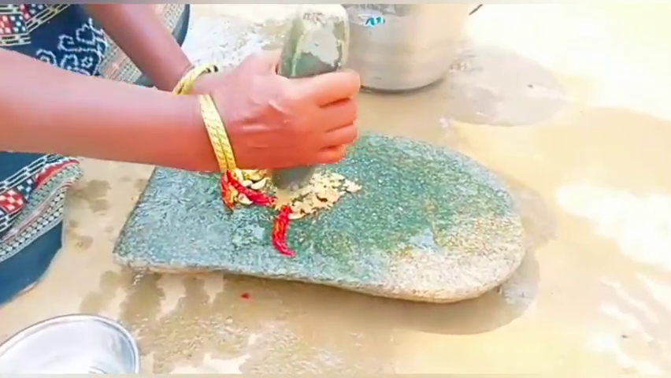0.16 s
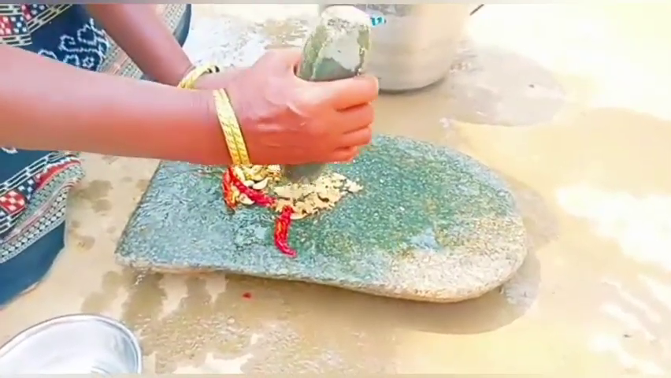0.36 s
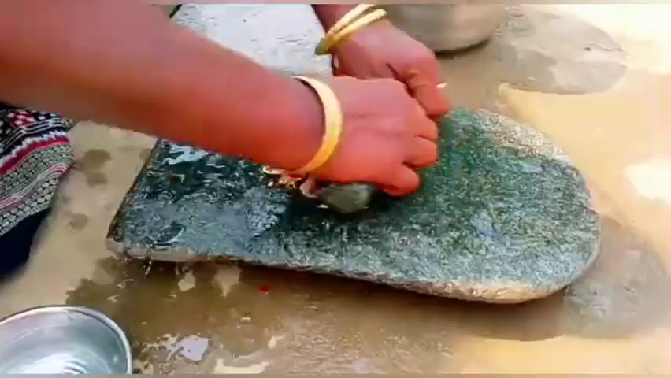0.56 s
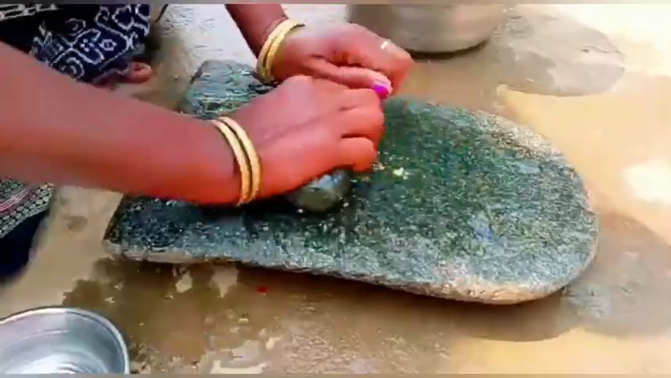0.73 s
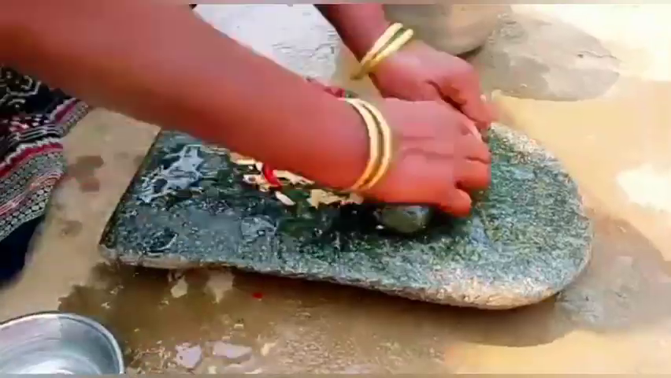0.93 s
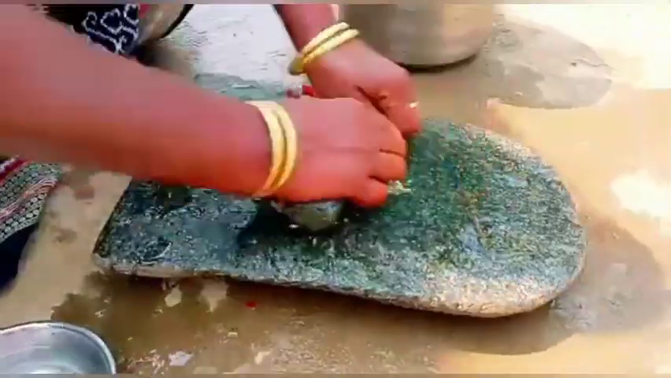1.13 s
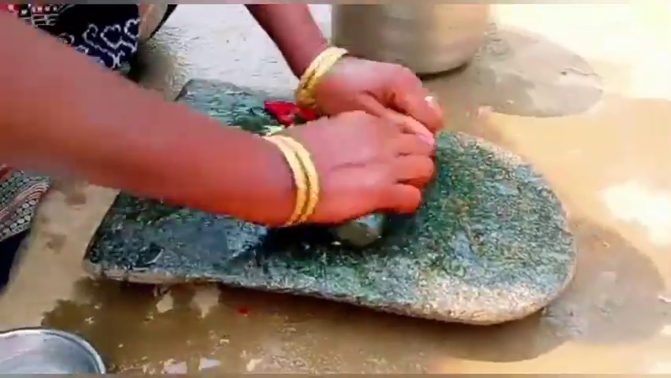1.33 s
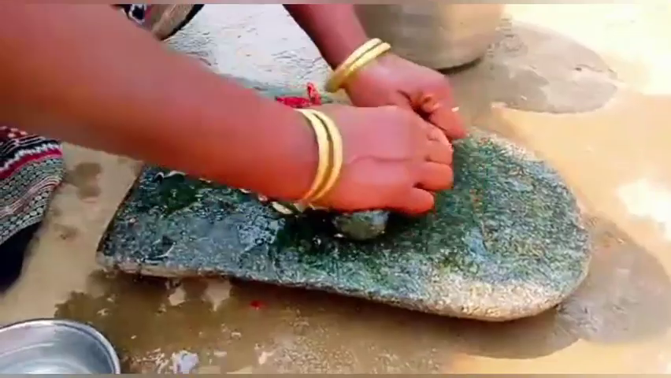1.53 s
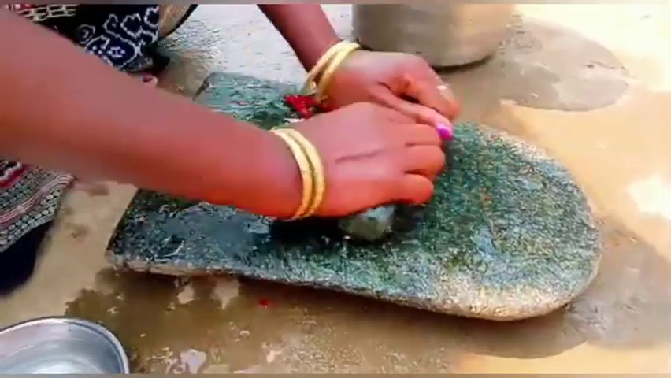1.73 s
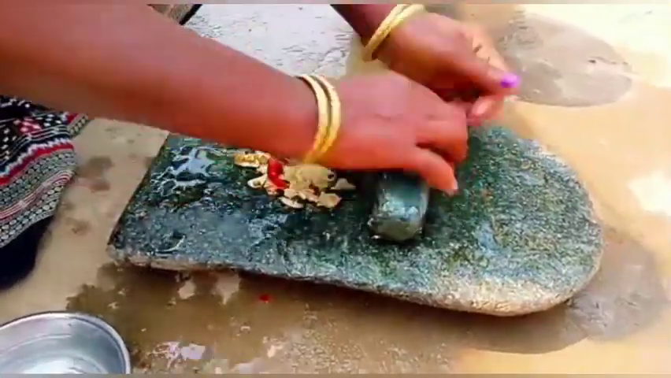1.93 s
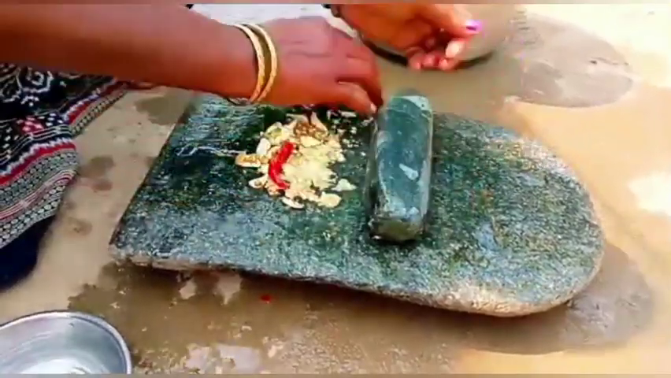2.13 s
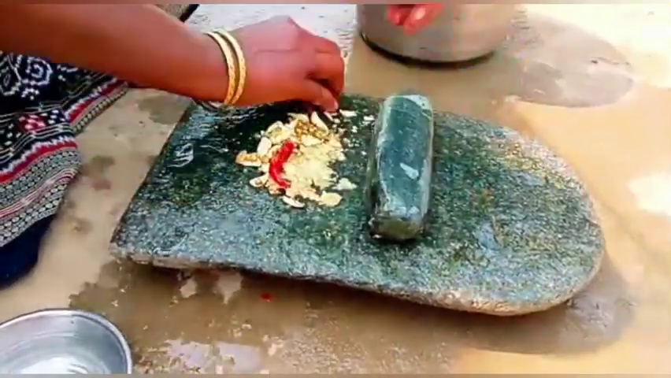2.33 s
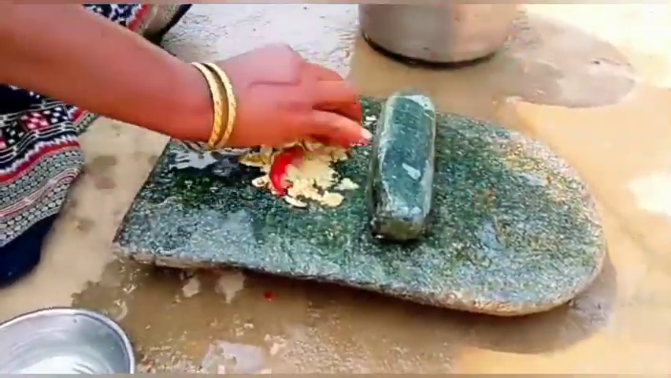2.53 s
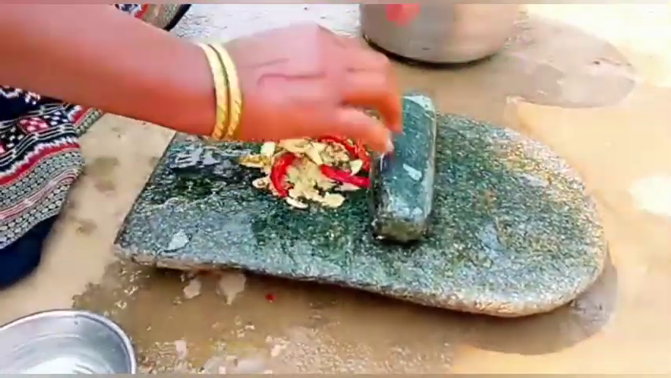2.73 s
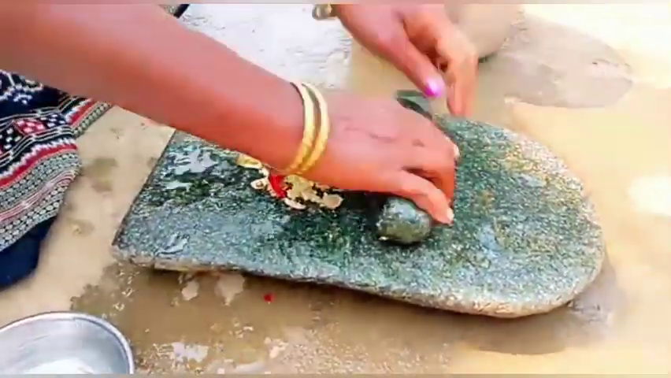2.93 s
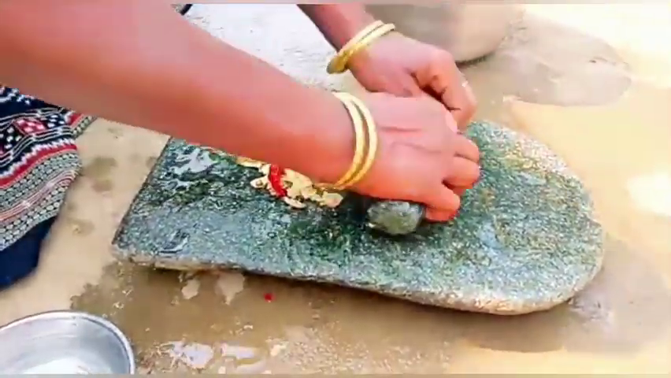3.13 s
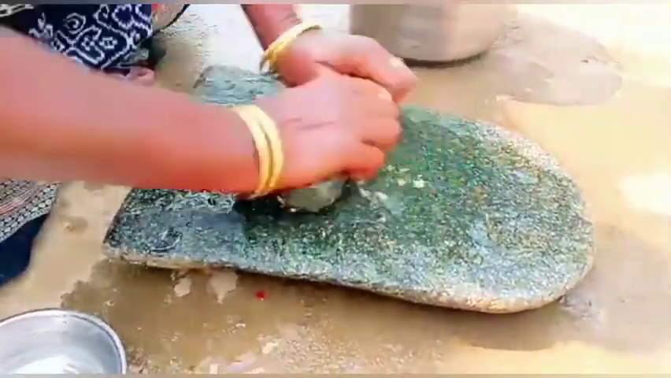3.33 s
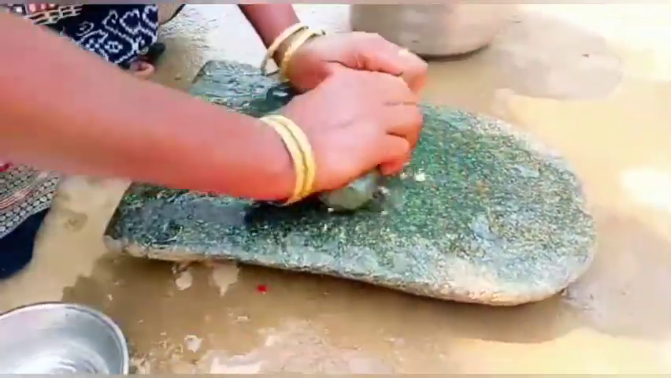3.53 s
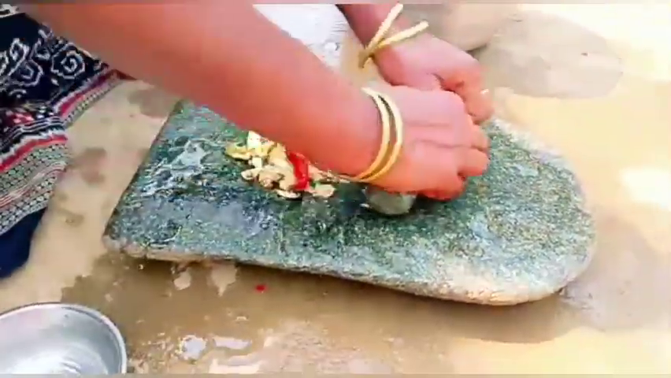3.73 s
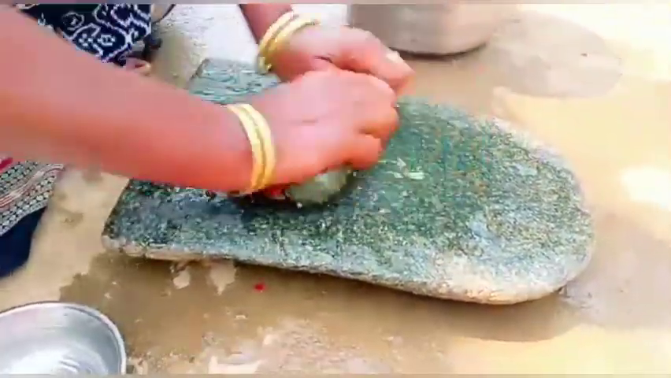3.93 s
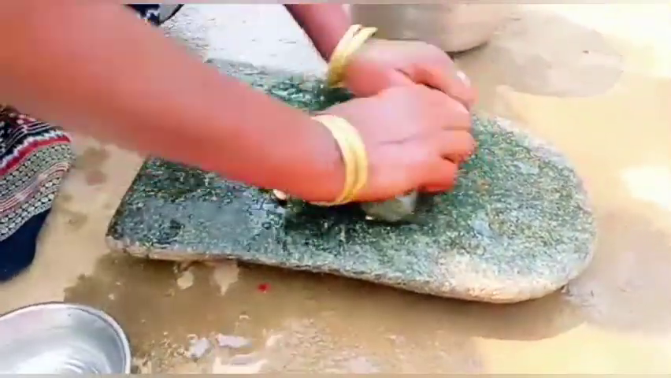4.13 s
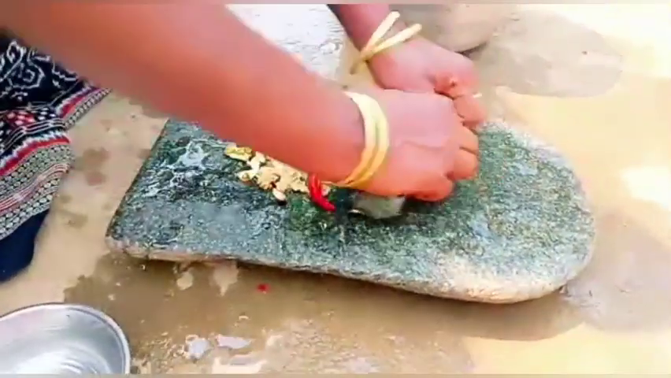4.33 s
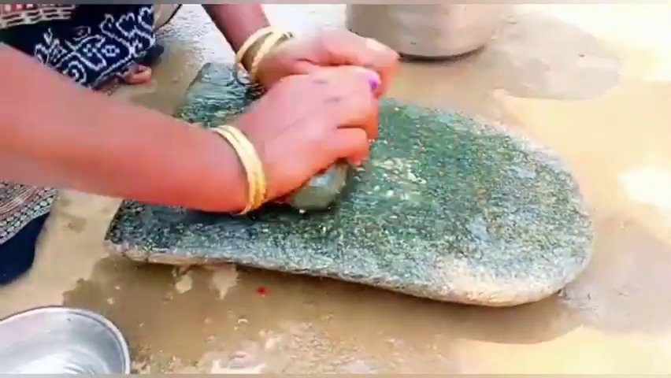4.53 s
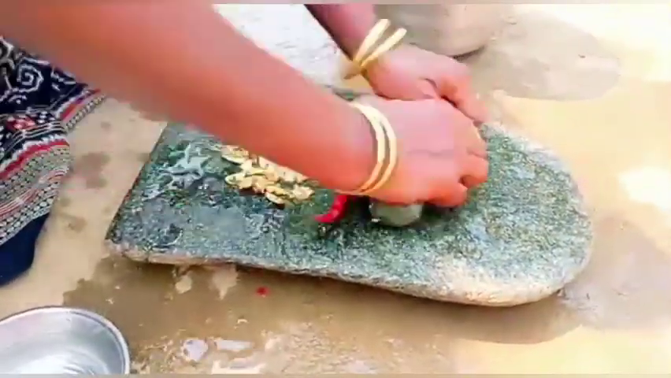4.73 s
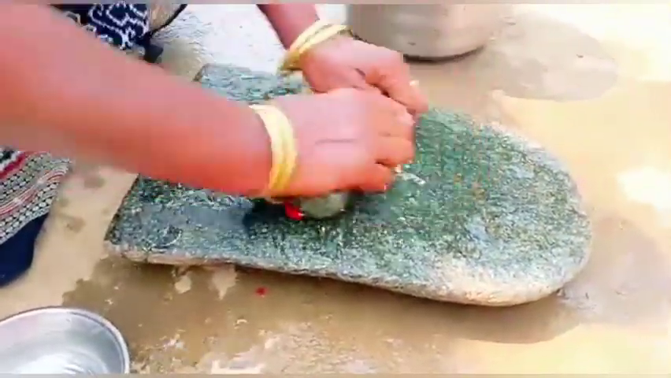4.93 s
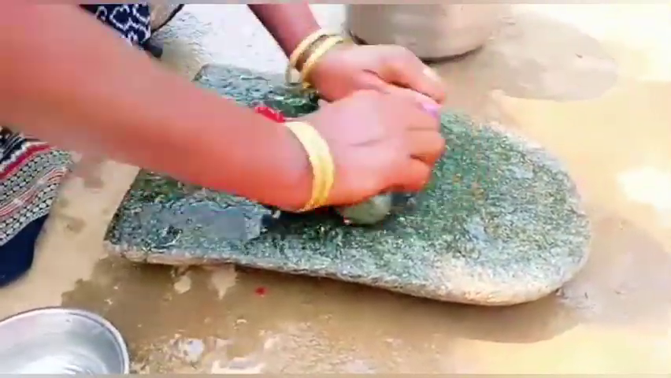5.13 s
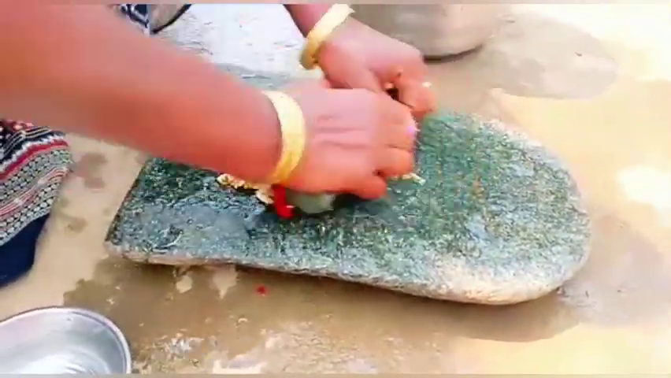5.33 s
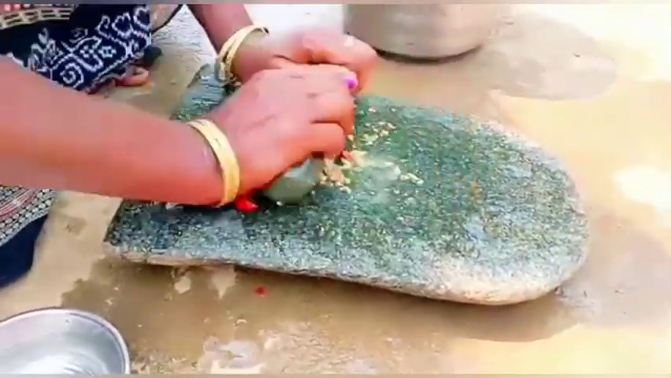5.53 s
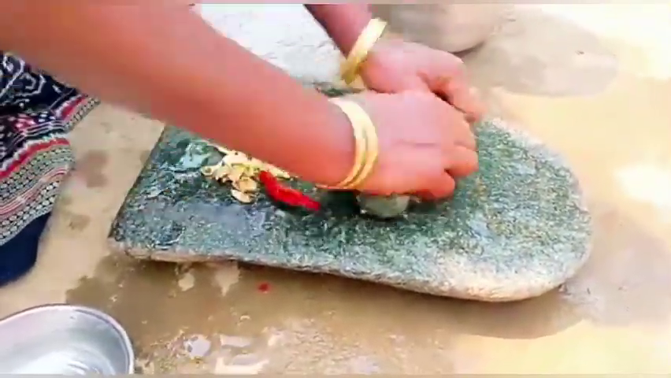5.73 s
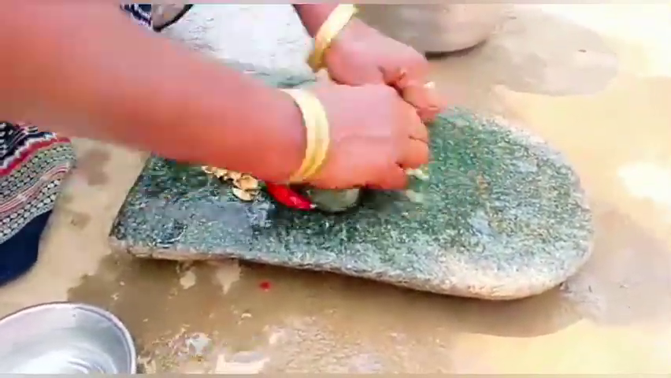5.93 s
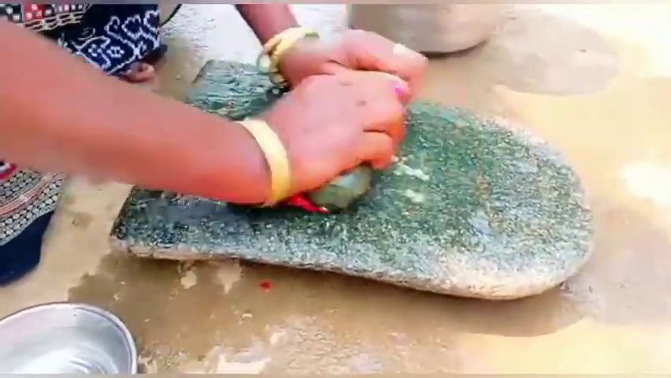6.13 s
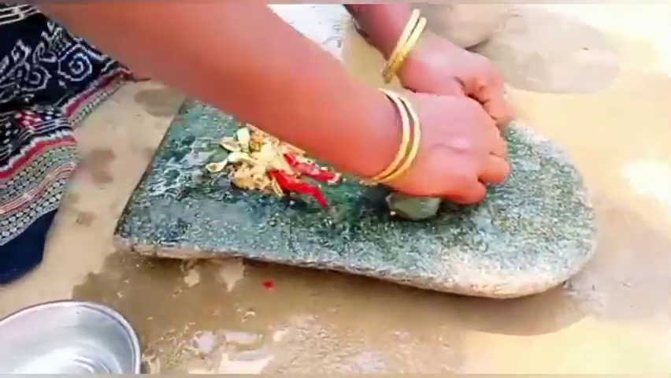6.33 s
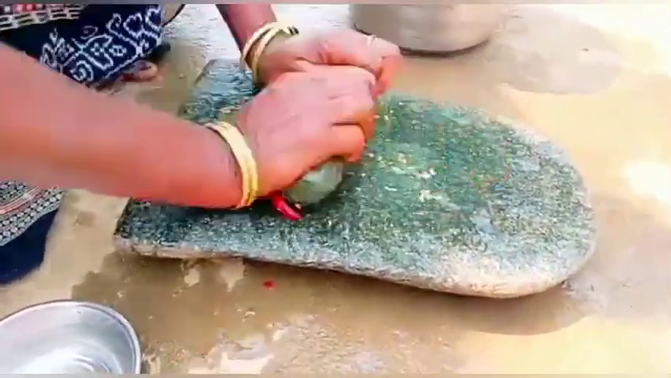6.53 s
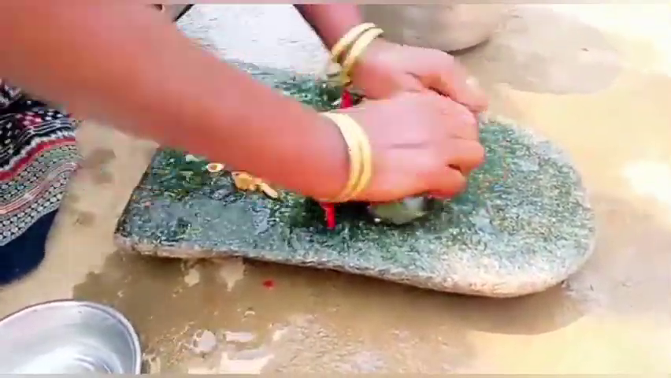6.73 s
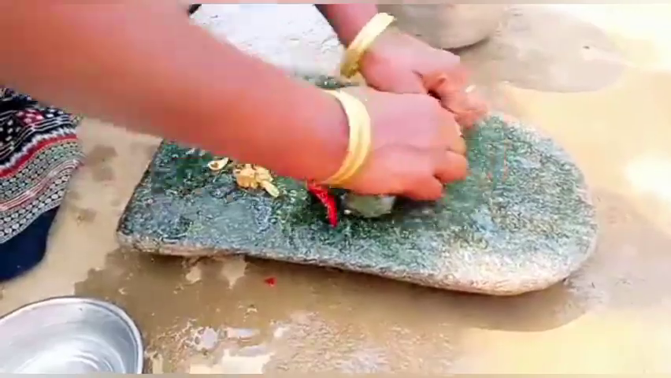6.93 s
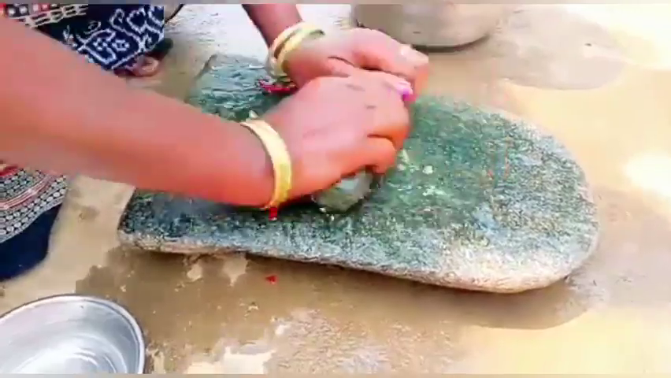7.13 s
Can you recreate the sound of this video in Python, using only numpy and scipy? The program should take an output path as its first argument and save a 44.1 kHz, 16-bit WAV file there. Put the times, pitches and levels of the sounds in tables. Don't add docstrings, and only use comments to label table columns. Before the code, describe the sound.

Close stereo outdoors. A hand stone pounds dried chillies and garlic once, husks bursting over a dull thud; the sound cuts out for an instant. Gritty rubbing follows, to and fro on the slab, then a quieter moment of fingers sweeping crumbs and a soft set-down. Rubbing resumes stronger, with cracking husks, stone knocks and high bangle clinks over a faint hum and insect hiss.

```python
import sys
import numpy as np
from scipy import signal
from scipy.fft import rfft, irfft, next_fast_len
from scipy.io import wavfile
from scipy.ndimage import uniform_filter1d

SR = 44100
rng = np.random.default_rng(int(sys.argv[2]) if len(sys.argv) > 2 else 0)


def to_wav(sig):
    pcm = np.clip(np.atleast_2d(sig), -1, 1) * 32767
    pcm = np.round(pcm).astype(np.int16)
    wavfile.write(sys.argv[1], SR, pcm.T)


def ratio(d):
    e = np.asarray(d, float) / 20
    return 10 ** e


N = 320597

# [f/Hz, level/dB, t60/s]
STONE_MODES = [(388, -18, 0.047), (601, -21.5, 0.085), (675, -5, 0.016), (951, -3.5, 0.026),
               (1118, -3.5, 0.015), (1366, -10.5, 0.018), (1676, -2, 0.0089), (1960, -8.5, 0.025),
               (2189, -13.5, 0.042), (2350, -17, 0.011), (2900, -27, 0.064)]
# [f/Hz, level/dB, t60/s]
BED_MODES = [(70, -5.5, 0.14), (137.3, 2, 0.085), (181.3, -2.5, 0.09), (231.8, 0, 0.056)]


def rms_one(x):
    return x / np.sqrt(np.mean(x ** 2) + 1e-20)


def shaped(x, points, lag_samples=0):
    size = next_fast_len(N)
    hz = np.arange(size // 2 + 1) * SR / size + 1
    points = np.array(points)
    gain = ratio(np.interp(np.log(hz), np.log(points[:, 0]), points[:, 1]))
    delay = np.exp(-2j * np.pi * hz * lag_samples / SR)
    return irfft(rfft(x, size) * gain * delay, size)[..., :N]


def band(x, low_hz, high_hz, order=3):
    edges_hz = [low_hz, min(high_hz, .45 * SR)]
    return signal.sosfilt(signal.butter(order, edges_hz, "band", fs=SR, output="sos"), x)


def drift(rate_hz):
    r = np.exp(-2 * np.pi * rate_hz / SR)
    wander = signal.lfilter([1], [1, -2 * r, r * r], rng.standard_normal(N + SR))
    return rms_one(wander[SR:])


def ring(x, hz, t60):
    r = ratio(-60 / (t60 * SR))
    w = 2 * np.pi * hz / SR
    return signal.lfilter([0, np.sin(w)], [1, -2 * r * np.cos(w), r * r], x + 1e-18)


def resonance(x, hz, width_hz):
    r = np.exp(-np.pi * width_hz / SR)
    poles = [1, -2 * r * np.cos(2 * np.pi * hz / SR), r * r]
    return signal.lfilter([(1 - r * r) / 2, 0, (r * r - 1) / 2], poles, x)


def friction(per_s, spread_db, grain_db, alike):
    sizes = ratio(spread_db * np.minimum(rng.exponential(1, N), 5)) * rng.choice([-1, 1], N)
    grains = sizes * (rng.random(N) < per_s * ratio(5 * drift(25)) / SR)
    shared, left, right = rng.standard_normal((3, N))
    smooth = np.sqrt(alike) * shared + np.sqrt(1 - alike) * np.array([left, right])
    return ratio(grain_db) * rms_one(grains) + smooth


def puffs(times, peak_db, decay_s):
    clicks = np.zeros(N)
    clicks[(times * SR).astype(int)] = ratio(peak_db)
    envelope = signal.lfilter([1], [1, -np.exp(-1 / (decay_s * SR))], clicks + 1e-18)
    return envelope * rng.standard_normal(N)


def struck(times, peak_db, favoured_hz, rattle_s, pan_db, modes,
           favour_db, octaves, scatter_db, rebound_db, wobble_db):
    length = 2000
    t, out = np.arange(length) / SR, np.zeros((2, N))
    chance = np.clip(rng.standard_normal((len(times), len(modes))), -1.5, 1.5)
    hit = rng.random((len(times), length)) < .05
    rebounds = rng.standard_normal((len(times), length)) * hit
    rebounds *= ratio(rebound_db) * np.exp(-(t / np.clip(rattle_s, .001, .04)[:, None]) ** 2)
    rebounds[:, 0] = 1
    rebounds /= np.sqrt(np.sum(rebounds ** 2, axis=1))[:, None]
    sides = ratio(np.outer(pan_db, [.5, -.5]))
    wobble = ratio(wobble_db * np.tanh(drift(80)))
    for k, (hz, level_db, t60) in enumerate(modes):
        far = 1 - np.exp(-.5 * (np.log2(hz / favoured_hz) / octaves) ** 2)
        strength = ratio(peak_db + (level_db - favour_db + scatter_db * chance[:, k]) * far)
        blows = np.zeros((2, N + length))
        for s, g, side, rebound in zip(times, strength, sides, rebounds):
            start = int(s * SR)
            blows[:, start:start + length] += np.outer(g * side, rebound)
        lean = ratio(.15 * wobble_db * rng.standard_normal((2, 1)))
        wobbles = [np.roll(wobble, 7001 * k), np.roll(wobble, 9001 * (k + 1))]
        out += (-1) ** k * lean * ring(blows[:, :N], hz, t60) * wobbles
    return out


def pressure(groups, rest_db):
    t = np.arange(0, N + 64, 64) / SR
    power = ratio(2 * np.array(rest_db))[:, None] + 0 * t
    for strokes, (fade_in, share, fade_out, start_db, end_db) in groups:
        for s, length, db, *over_db in strokes:
            knots = np.cumsum([s - fade_in, fade_in, share * length, (1 - share) * length, fade_out])
            course_db = np.interp(t, knots, [-40, start_db, 0, end_db, -40], -90, -90)
            layer_db = db + np.array([0, *over_db])[:, None]
            power = power + ratio(2 * (course_db + layer_db))
    return [np.interp(np.arange(N) / SR, t, np.sqrt(p)) for p in power]


def air():
    # [f/Hz, level/dB per Hz]
    hum_colour = [(35, -29.5), (75, 3.5), (256, -18), (335, -4.5), (705, -29), (1070, -15), (2760, -15),
                  (4300, -22), (5300, -11), (7000, -45), (9100, -76.5), (15400, -120)]
    # [t/s, level/dB]
    hum_level = [
        (0, -74),
        (.45, -74.5),
        (.56, -88),
        (.75, -67),
        (1.75, -65),
        (1.9, -63.5),
        (2.85, -64),
        (3.05, -63.5),
        (7.27, -65),
    ]
    s, level_db = np.transpose(hum_level)
    hum = rms_one(shaped(friction(30, 1.5, -30.0, alike=0.43), hum_colour))
    edges_hz = 20 * 4 ** np.arange(5)
    hum = sum(ratio(4.84 * drift(5.1)) * band(hum, low, 4 * low, order=2) for low in edges_hz)
    insects = rms_one(band(rng.standard_normal((2, N)), 7700, 10700, order=6))
    return ratio(np.interp(np.arange(N) / SR, s, level_db)) * (hum + ratio(-9.5) * insects)


def yard(x):
    out = np.zeros((2, N))
    lags = (rng.uniform(0.002, 0.016, 12) * SR).astype(int)
    for k, lag in enumerate(lags):
        out[k % 2, lag:] += x[:N - lag] * (-1) ** (k // 2) * ratio(-1300 * lag / SR)
    return out


def skids():
    # [t/s, length/s, level/dB, f/Hz]
    loose_pieces = [(1.832, 0.027, -51, 4950), (1.84, 0.089, -58, 3190), (1.841, 0.053, -58.5, 1191),
                    (2.052, 0.048, -60.5, 610), (2.124, 0.021, -55.5, 4140), (2.635, 0.039, -64.5, 1045),
                    (3.7, 0.14, -53, 4960), (5.7, 0.012, -47, 5010), (4.148, 0.032, -61, 5060),
                    (4.238, 0.055, -59.5, 5000), (5.083, 0.053, -51, 2130), (5.365, 0.053, -71, 13000)]
    width_hz, size = 45, 8000
    t, out = np.arange(size) / SR, np.zeros(N)
    for s, length, db, hz in loose_pieces:
        hiss = rng.standard_normal(size)
        note = rms_one(resonance(resonance(hiss, hz, width_hz), hz, 2 * width_hz))
        fade_db = np.interp(t, [0, .004, length, length + .04], [db - 30, db, db - 6, db - 40], right=-150)
        start = int(s * SR)
        out[start:start + size] += note * ratio(fade_db)
    return out


def set_down():
    push = np.zeros(N)
    push[int(2.8735 * SR)] = ratio(-39.5)
    damped = sum(ring(push, hz, .085) for hz, _, _ in BED_MODES[1:] + STONE_MODES[:2])
    return band(damped, 130, 520, order=2)


def flakes():
    # [t/s, peak level/dB]
    snaps = [(0.757, -44), (1.249, -34.5), (2.623, -43.5), (3.259, -43.5), (3.559, -44), (3.597, -40.5),
             (3.788, -45), (3.809, -48), (3.824, -40), (3.888, -40), (4.075, -43), (4.131, -42),
             (4.15, -56), (4.17, -47.5), (4.337, -44), (4.427, -37.5), (4.832, -46), (5.374, -51),
             (5.569, -49), (5.594, -40), (5.61, -43), (5.829, -50), (5.839, -41), (6.146, -46), (6.48, -42),
             (6.721, -56), (6.979, -48), (7.004, -44)]
    s, peak_db = np.transpose(snaps)
    return np.array([band(puffs(s, peak_db + 8.0, 0.00092), 5700, 15800, order=2) for side in range(2)])


def cracks():
    # [t/s, peak level/dB, centre f/Hz]
    husks = [(0.66, -51.5, 6050), (.757, -57, 5460), (1.24, -27.5, 5580), (1.672, -36, 5460),
             (2.25, -39, 5200), (3.2605, -39, 5200), (3.5523, -37, 5230), (3.886, -33.5, 4900),
             (4.15, -40, 5000), (4.527, -35.5, 5160), (4.6063, -33.5, 5100), (5.8377, -25.5, 5500),
             (6.1053, -30, 5100), (6.1596, -36, 5660), (6.359, -37, 5450), (6.4796, -33, 5730),
             (6.5298, -27, 5760), (1.0044, -51, 5400), (1.298, -32, 5570), (1.381, -36, 5040),
             (1.8347, -53, 4800), (2.236, -39.5, 5270), (2.6223, -35.5, 6140), (3.337, -33.5, 5200),
             (3.398, -26.5, 5500), (3.429, -34, 4830), (3.45, -24.5, 4970), (3.494, -22.5, 5000),
             (3.9659, -30, 6370), (4.173, -38.5, 5050), (4.462, -31.5, 5500), (4.9708, -21.5, 5530),
             (5.07, -27, 5480), (5.3334, -36, 5140), (5.371, -41, 5140), (5.473, -34.5, 6200),
             (5.5183, -27.5, 6300), (5.56, -29.5, 4700), (5.5787, -25, 5200), (5.607, -25, 5480),
             (5.8288, -27.5, 5100), (5.9927, -36, 6000), (6.022, -28, 5740), (6.5068, -30, 5340),
             (6.615, -34, 5200), (7.0219, -21.5, 5750)]
    # [t/s, peak level/dB]
    seeds = [
        (2.5, -36),
        (3.485, -33),
        (4.081, -31),
        (4.335, -48),
        (4.426, -26.5),
        (4.45, -43),
        (4.851, -35.5),
        (5.2966, -27),
        (5.541, -29.5),
        (5.5947, -29.5),
    ]
    seed_hz, size = 2940, 600
    t, out = np.arange(size) / SR, np.zeros(N + size)
    for s, peak_db, hz in sorted(husks + [(*row, seed_hz) for row in seeds]):
        hiss = rng.standard_normal(size) * np.exp(-t / 0.0016)
        snap = resonance(hiss, hz, 340) * np.minimum(t / 0.00053, 1)
        start = int(s * SR)
        out[start:start + size] += ratio(peak_db + 2.0) * snap / np.abs(snap).max()
    return out[:N]


def bangles():
    # [t/s, peak level/dB, favoured f/Hz, rattle/s]
    slaps = [(1.166, -36, 11180, 0.015), (1.374, -40.5, 12650, 0.027), (1.777, -39, 13100, 0.0045),
             (2.118, -34.5, 12600, 0.023), (2.802, -36.5, 11400, 0.0076), (3.347, -42.5, 11430, 0.0048),
             (3.3974, -24, 12430, 0.0037), (4.091, -42, 13000, 0.0073), (5.998, -27.5, 12470, 0.012),
             (4.467, -20.5, 12700, 0.012), (4.9712, -11.5, 13100, 0.0083), (5.489, -25.5, 12400, 0.025),
             (5.993, -27, 12700, 0.0044), (6.096, -31, 12600, 0.012), (6.079, -35, 12400, 0.0088),
             (6.2363, -23.5, 12700, 0.026), (6.5065, -19, 13300, 0.0047), (6.513, -22.5, 12100, 0.0034),
             (6.526, -17, 11400, 0.008), (7.023, -22, 12800, 0.025)]
    # [t/s, peak level/dB, favoured f/Hz, rattle/s]
    slides = [(.62, -48, 11400, 0.0069), (1.599, -39, 11500, 0.0053), (1.613, -43, 9520, 0.0036),
              (1.885, -45.5, 11400, 0.0057), (2.163, -40, 13200, 0.01), (3.415, -22.5, 9510, 0.0036),
              (3.634, -32, 12700, 0.005), (3.649, -22.5, 12200, 0.024), (3.965, -25.5, 13100, 0.0034),
              (4.475, -25.5, 12000, 0.0076), (4.707, -31, 12400, 0.005), (4.7119, -21.5, 12650, 0.022),
              (5.191, -45, 12900, .004), (5.194, -19, 12900, 0.021), (5.472, -28.5, 13220, 0.033),
              (5.522, -26.5, 9500, 0.011), (5.674, -28, 12430, 0.03), (6.025, -25.5, 12500, 0.0044),
              (6.026, -15, 11500, 0.0063), (6.206, -28.5, 12100, 0.015), (6.489, -29, 11400, 0.0048),
              (6.621, -31.5, 9520, 0.012), (6.665, -35.5, 13200, 0.01), (6.734, -30.5, 13000, 0.013),
              (6.753, -22, 12700, 0.018), (7.035, -20, 11400, 0.0093), (7.214, -40, 12640, 0.021),
              (7.233, -23, 13060, 0.0069)]
    # [f/Hz, level/dB, t60/s]
    wide_modes = [(2155, -26, .08), (4080, -20, .09), (6374, -14, .06), (6584, -12, .06), (7600, -24, .05),
                  (9220, -21, .06), (9518, -11, .07), (12090, -17, .05), (12430, -5, .08), (12875, -3, .11),
                  (12960, -8, .06), (13700, -19, .04), (15080, -15, .05)]
    # [f/Hz, level/dB, t60/s]
    narrow_modes = [(8700, -20, .04), (10980, -12, .05), (11415, 0, .055), (11760, -10, .04),
                    (14820, -17, .05)]
    slap_tick_db, slide_tick_db = -8.5, -24.5
    skin_damping = 0.6
    touches = [(*row, slap_tick_db) for row in slaps] + [(*row, slide_tick_db) for row in slides]
    s, peak_db, hz, rattle_s, tick_db = np.transpose(sorted(touches))
    narrow = (hz > 10300) & (hz < 12000)
    pan_db = np.where(s < 3, 5.5, 0.3)
    rings = 0
    for own, modes in ((narrow, narrow_modes), (~narrow, wide_modes)):
        damped = np.array(modes) * [1, 1, skin_damping]
        rings = rings + struck(s[own], peak_db[own] - 5.5, hz[own], rattle_s[own], pan_db[own], damped,
                               favour_db=1.5, octaves=0.013, scatter_db=3.5, rebound_db=-15.5, wobble_db=9.0)
    ticks = [band(puffs(s, peak_db + tick_db + 12.0, 0.0012), 10500, 23500, order=2) for side in range(2)]
    left, right = rings + np.array(ticks)
    return np.array([np.roll(left, -1), right])


def knocks():
    # [t/s, peak level/dB, favoured f/Hz]
    edge_hits = [(1.376, -32.5, 2540), (1.465, -28.5, 1750), (1.641, -52.5, 1960), (3.125, -33.5, 1880),
                 (3.148, -34, 1790), (3.171, -26, 1850), (3.205, -43, 2010), (3.397, -31, 1740),
                 (3.581, -35, 2280), (4.17, -41.5, 1610), (4.425, -33, 1580), (4.463, -33, 1660),
                 (4.72, -49.5, 1750), (4.971, -34, 1960), (5.295, -14.5, 2230), (5.334, -29.5, 1760),
                 (5.472, -39.5, 1740), (5.538, -26.5, 1600), (5.993, -38, 1750), (6.504, -34, 1660),
                 (7.02, -32, 1610)]
    # [t/s, peak level/dB, favoured f/Hz]
    flat_drops = [(2.873, -54, 397), (3.052, -50, 820), (3.102, -35.5, 960), (3.71, -32.5, 890),
                  (4.014, -30, 514), (4.284, -44, 920), (4.595, -31.5, 525), (5.163, -40.5, 610),
                  (5.296, -20.5, 950), (1.466, -38.5, 970), (1.378, -45, 1070), (3.172, -36, 940),
                  (5.411, -36.5, 850), (5.796, -38.5, 910), (5.826, -26.5, 980), (5.849, -27.5, 940),
                  (6.312, -41, 660)]
    out = 0
    for rows, low_hz in ((edge_hits, 876), (flat_drops, 480)):
        s, peak_db, hz = np.transpose(rows)
        stone = struck(s, peak_db + 1.5, hz, 0.0099 + 0 * s, 0 * s, STONE_MODES, favour_db=15.5,
                       octaves=0.39, scatter_db=4.5, rebound_db=-13.0, wobble_db=-0.5)
        tick = resonance(puffs(s, peak_db + 4.0, 0.0033), 2600, 1600)
        out = out + band(stone + tick, low_hz, 2190)
    return out


def pound():
    # [f/Hz, level/dB, t60/s]
    thud_modes = [(87, -2, 0.24), (125, -1, .12), (168, 10.5, 0.031), (258, -14, 0.14), (416, -35, 0.11),
                  (765, -5, 0.017), (865, -1, 0.025), (1750, -10.5, 0.016)]
    pound_s, pound_db = .1645, -28.5
    s = np.array([pound_s])
    push = np.zeros(N)
    push[int((pound_s + .0025) * SR)] = ratio(pound_db)
    thud = sum(ratio(db) * ring(push, hz, t60) * ratio(5.0 * drift(25.0)) for hz, db, t60 in thud_modes)
    burst = band(puffs(s, pound_db + 2.5, 0.0013), 3700, 23000)
    crumbs = band(puffs(s, pound_db - 36.5, 0.071), 1500, 15500)
    return band(thud, 110, 2700, order=2) + burst + crumbs


def slab_rumble():
    low = friction(35, 2.7, -9.0, alike=0.96) * ratio(5.9 * drift(13.0))
    rumble = 0
    for k, (hz, db, t60) in enumerate(BED_MODES):
        rumble = rumble + ratio(db + 3.2 * drift(11.3)) * ring(low, hz, t60) * (-1) ** k
    rumble = rumble / uniform_filter1d(np.mean(rumble ** 2, axis=0), 3000) ** .3
    return band(rumble, 75, 290, order=4)


def stone_scrape():
    slab_modes, db_per_doubling = 5, 2
    middle = friction(250, 2.35, 0.5, alike=0.45)
    tones = []
    for k, (hz, db, t60) in enumerate(STONE_MODES):
        level_db = db + db_per_doubling * np.log2(t60) + 4.3 * drift(9.1)
        tones.append(ratio(level_db) * ring(middle, hz, t60) * (-1) ** k)
    return band(sum(tones[:slab_modes]), 340, 1300), band(sum(tones[slab_modes:]), 1100, 3100)


def grit_crunch():
    # [f/Hz, width/Hz, level/dB]
    grit_bands = [(2880, 460, -8), (3297, 144, -0.5), (3776, 720, -8), (4970, 366, -5.5), (5480, 316, -1),
                  (6150, 7600, -15.5)]
    # [f/Hz, level/dB per Hz]
    dust_colour = [(3820, -9.5), (6500, 3.5), (8320, -7.5), (9400, -4), (11000, -1), (12700, -5),
                   (15700, -14)]
    coarse_bands = 3
    high = friction(1500, 4.16, -2.9, alike=0.11)
    grit = [ratio(db + 3.4 * drift(17.2)) * resonance(high, hz, width_hz) * (-1) ** k
            for k, (hz, width_hz, db) in enumerate(grit_bands)]
    dust = shaped(high + 2.0 * rng.standard_normal((2, N)), dust_colour)
    fine = band(sum(grit[coarse_bands:]), 4000, 7000)
    coarse = band(sum(grit[:coarse_bands]), 2200, 4600)
    return fine, band(dust, 7600, 19000), coarse


def rubbing():
    # [t/s, length/s, rumble level/dB]
    drags = [(0.0, 0.022, -51.5), (0.84, 0.091, -46), (1.017, 0.093, -45.5), (1.202, 0.19, -63.5),
             (1.34, 0.046, -45.5), (1.476, 0.067, -48), (1.74, 0.029, -45), (1.85, 0.062, -56),
             (2.476, 0.062, -67), (2.58, 0.5, -67), (3.11, 0.11, -45), (3.21, 0.026, -44.5),
             (3.395, 0.21, -57), (3.566, 0.041, -46.5), (3.741, 0.11, -48.5), (3.92, 0.025, -53.5),
             (4.016, 0.16, -47.5), (4.262, 0.2, -50.5), (4.566, 0.17, -53), (4.776, 0.15, -50.5),
             (5.02, 0.26, -54), (5.251, 0.22, -52.5), (5.522, 0.079, -49.5), (5.685, 0.044, -50.5),
             (5.819, 0.088, -49), (5.988, 0.25, -53), (6.341, 0.19, -49), (6.577, 0.25, -51),
             (6.808, 0.2, -49.5), (7.049, 0.58, -51.5)]
    # [t/s, length/s, slab level/dB, hand stone over it/dB]
    scrapes = [(.76, 0.076, -71.5, 7), (.85, 0.068, -52.5, -7), (1.01, 0.083, -50.5, -2),
               (1.22, 0.056, -59, 10), (1.29, 0.11, -59, -8), (1.48, 0.065, -54, -0.5),
               (1.74, 0.038, -63, -1.5), (1.84, 0.18, -75.5, -1), (1.97, 0.2, -63, -6),
               (2.2, 0.12, -64.5, -6), (2.45, 0.089, -59.5, -2), (2.64, 0.21, -66, -37),
               (3.06, 0.1, -55.5, 3.5), (3.1, 0.1, -48.5, -6), (3.4, 0.11, -67.5, 17.5),
               (3.55, 0.085, -56, -0.5), (3.71, 0.15, -51, 2.5), (4.012, 0.11, -41.5, -3),
               (4.16, 0.011, -49, -47), (4.27, 0.12, -54, -2), (4.4, 0.16, -66.5, 4),
               (4.595, 0.055, -51, -8), (4.72, 0.024, -56, -4.5), (4.78, 0.13, -53, -14),
               (5.03, 0.17, -63, -2.5), (5.17, 0.015, -60, 2), (5.24, 0.031, -58, 1.5),
               (5.3, 0.08, -49, 0.5), (5.47, 0.027, -74, 16), (5.55, 0.092, -54, 4), (5.71, 0.018, -63, -3),
               (5.8, 0.079, -47.5, 6), (5.9, 0.061, -69, -14), (6.0, 0.12, -58, 3), (6.19, 0.031, -55, -21),
               (6.315, 0.15, -48.5, 3.5), (6.5, 0.17, -62, 6.5), (6.67, 0.047, -52, -11.5),
               (6.78, 0.073, -57, -6), (6.85, 0.11, -43.5, -10), (7.03, 0.25, -62.5, -9)]
    # [t/s, length/s, grit level/dB, dust over it/dB, coarse grit over it/dB]
    pushes = [(0.746, 0.14, -46.5, -7, -4), (1.21, 0.11, -40, -8, -5.5), (1.482, 0.13, -50.5, -0.5, -6.5),
              (1.648, 0.092, -47.5, -3.5, -13.5), (3.398, 0.12, -37, -10, -5),
              (3.545, 0.049, -40.5, -13, -5), (3.975, 0.14, -40, -9, -3.5), (4.12, 0.045, -58, -4, -2.5),
              (4.461, 0.032, -45, -2, -1), (4.52, 0.14, -44.5, -8.5, -4.5), (4.971, 0.18, -44, -8.5, -10),
              (5.476, 0.039, -48.5, 4, -6), (5.53, 0.11, -36.5, -13, -4), (5.83, 0.12, -43.5, -12, -2.5),
              (5.994, 0.038, -44.5, 2, -3), (6.05, 0.13, -39.5, -16, -5.5), (6.501, 0.074, -41, -3.5, -7.5),
              (6.57, 0.099, -42.5, -10.5, -5), (7.018, 0.059, -44.5, 3.5, -1.5),
              (7.07, 0.11, -39.5, -12, -9)]
    # [t/s, length/s, grit level/dB, dust over it/dB, coarse grit over it/dB]
    pulls = [
        (0.607, 0.15, -69.5, -7, -4.5),
        (1.03, 0.14, -45.5, -10, -10.5),
        (3.12, 0.19, -54.5, -8, -16),
        (3.21, 0.093, -54.5, -11, 0.5),
        (3.75, 0.15, -46, -7.5, 1),
        (4.31, 0.12, -45.5, -6, 4.5),
        (4.82, 0.11, -43, -10, -1),
        (5.24, 0.24, -54.5, -12.5, -9.5),
        (6.35, 0.15, -40, -12.5, -5),
        (6.89, 0.088, -42, -12.5, -3),
    ]
    # [t/s, length/s, grit level/dB, dust over it/dB, coarse grit over it/dB]
    sweeps = [(1.836, 0.077, -62.5, -17, 4), (2.034, 0.12, -61, -7, 0.5), (2.24, 0.058, -54, 2, -3.5),
              (2.404, 0.053, -58, -18, -23), (2.49, 0.047, -50.5, -4.5, 0), (2.625, 0.11, -54, -1.5, -8),
              (2.794, 0.15, -76, 5, -12), (4.71, 0.027, -52.5, 2, -6), (6.2, 0.03, -46.5, -2.5, -12),
              (6.735, 0.078, -60, 2, -5), (7.2, 0.12, -57.5, -1, -24)]
    drag_shape = .082, .35, .15, -9, -6
    scrape_shape = .018, .55, .06, -4, -4
    push_shape = 0.025, 0.4, 0.065, -4, -5
    pull_shape = .09, .55, .08, -9, -5
    sweep_shape = 0.2, 0.5, 0.5, -8, -17
    rest_levels = -78, -88.5, -91.5, -82.5, -90.5, -92
    flutter = ratio(2.2 * drift(9.1))
    layers = [slab_rumble()] + [x * flutter for x in (*stone_scrape(), *grit_crunch())]
    gains = pressure([(drags, drag_shape)], rest_levels[:1])
    gains += pressure([(scrapes, scrape_shape)], rest_levels[1:3])
    gains += pressure([(pushes, push_shape), (pulls, pull_shape), (sweeps, sweep_shape)], rest_levels[3:])
    gains[2] = np.hypot(gains[2], ratio(-9.5) * gains[5])
    return sum(gain * rms_one(x) for gain, x in zip(gains, layers))


def scene():
    hits = pound() + set_down() + knocks() + cracks() + flakes() + bangles()
    top_cut = signal.cheby2(12, 50, 16100, fs=SR, output="sos")
    steady = signal.sosfilt(top_cut, rubbing() + air())
    steady = steady - .9 * resonance(steady, 7250, 900)
    echoes = yard(band(hits.mean(axis=0), 410, 16000, order=2))
    return steady + skids() + hits + ratio(-3.0) * echoes


def band_limit(x):
    return signal.sosfilt(signal.butter(12, 16970, fs=SR, output="sos"), x)


def record(dry):
    # [f/Hz, level/dB]
    side_colour = [(60, 1.0), (180, 0.0), (550, 1.0), (1650, 1.5), (4970, 3.0), (15000, 6.0)]
    half = np.array(side_colour) * [1, .5]
    left = shaped(dry[0], half, lag_samples=1.8)
    right = shaped(dry[1], half * [1, -1])
    top_cut = signal.cheby2(10, 60, 17000, fs=SR, output="sos")
    heard = signal.sosfilt(top_cut, np.array([left, right]))
    heard[:, int(.463 * SR):int(.547 * SR)] = 0
    return band_limit(heard)


dry = scene()
out = record(dry)
to_wav(out)
```